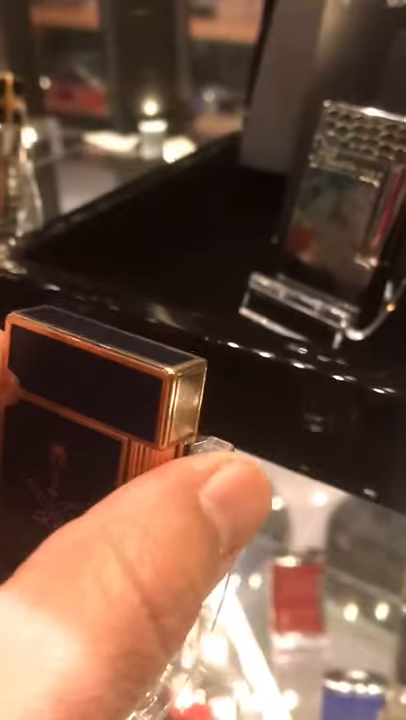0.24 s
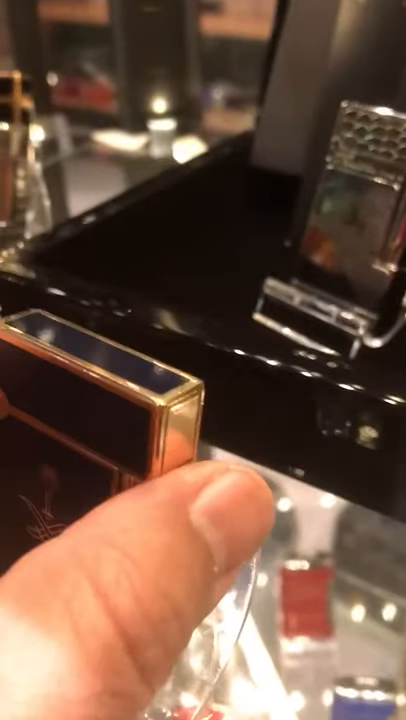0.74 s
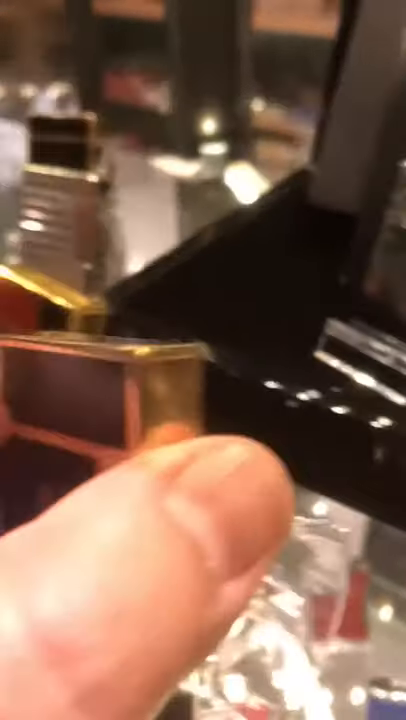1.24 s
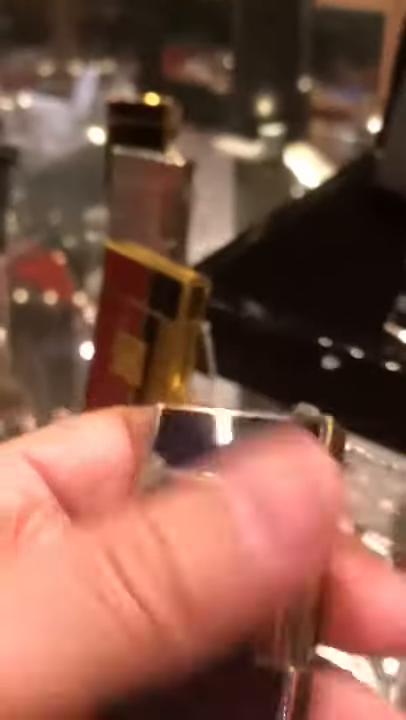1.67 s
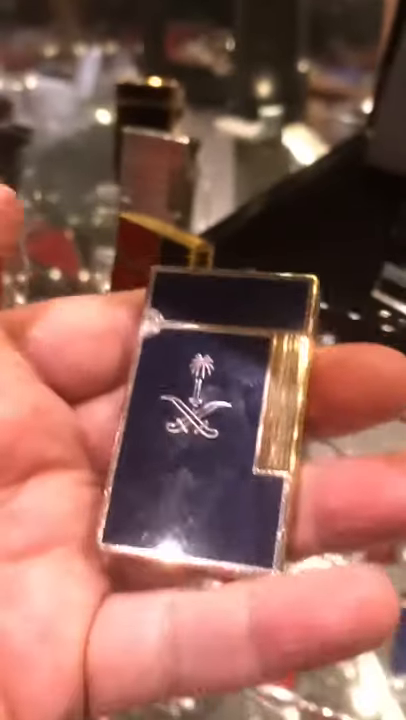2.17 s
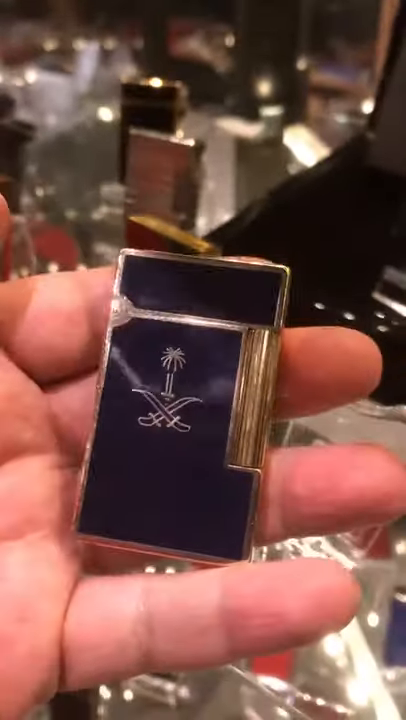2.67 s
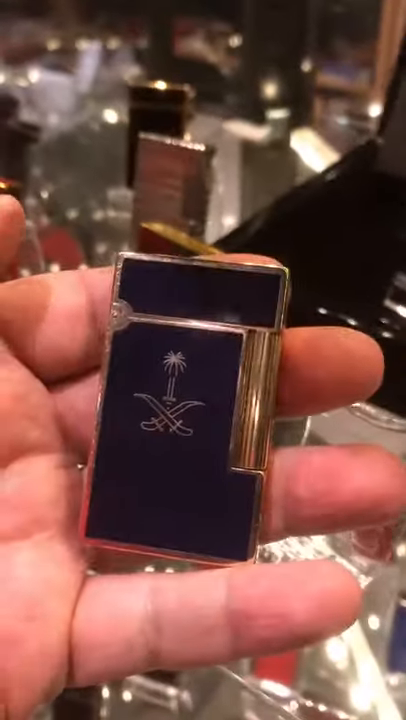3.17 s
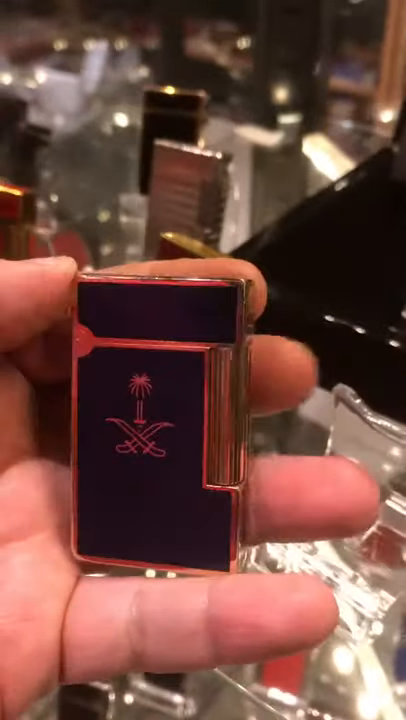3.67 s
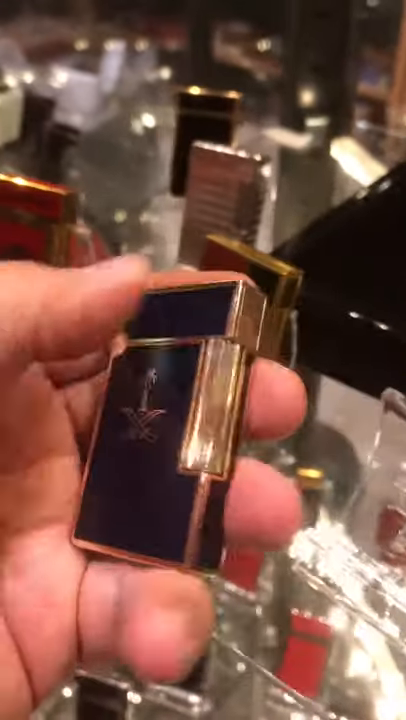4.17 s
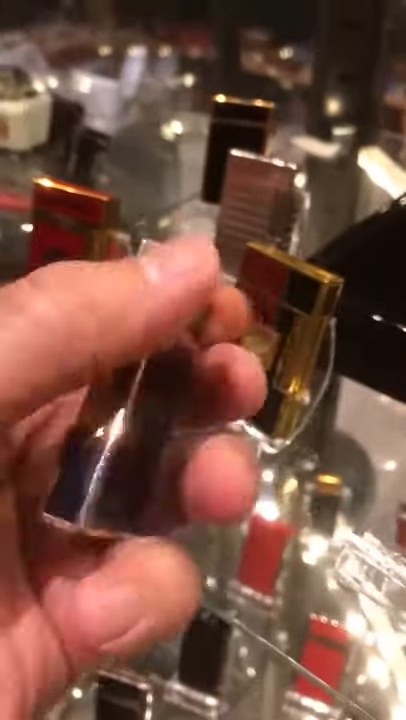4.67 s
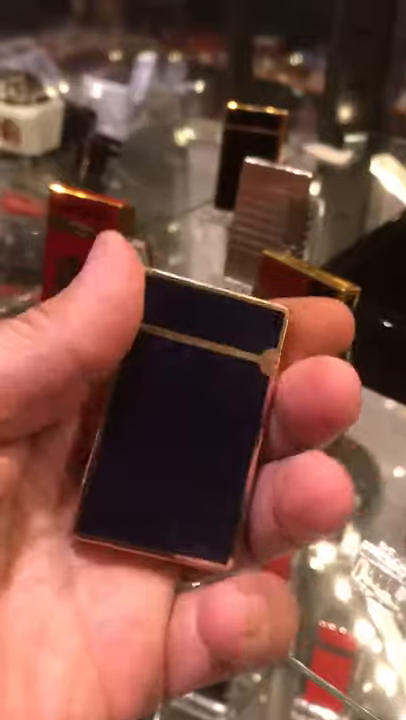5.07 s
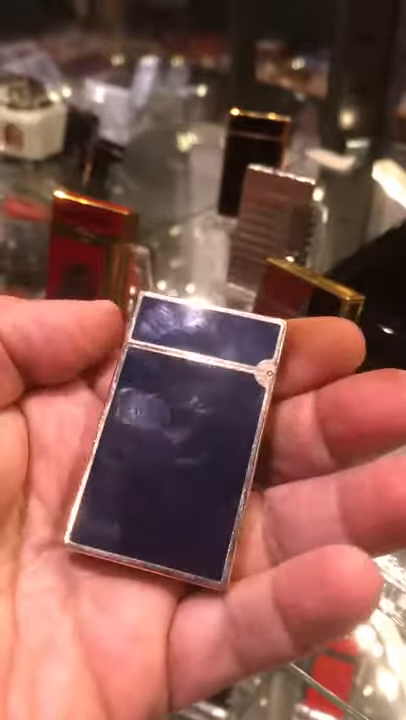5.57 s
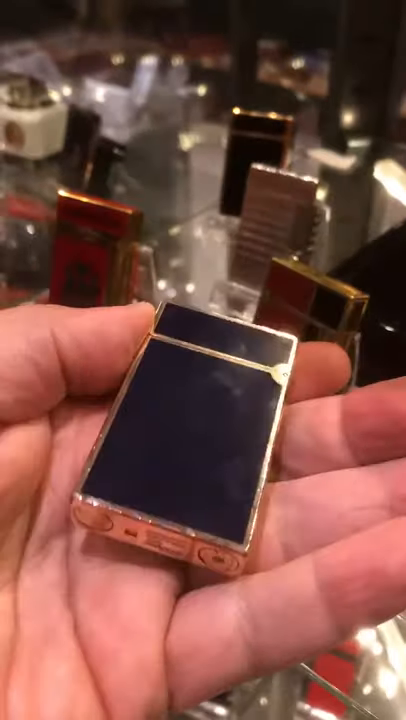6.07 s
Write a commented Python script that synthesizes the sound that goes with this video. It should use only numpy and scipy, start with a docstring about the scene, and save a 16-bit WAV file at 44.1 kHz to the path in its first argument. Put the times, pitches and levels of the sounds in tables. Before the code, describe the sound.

A shop interior hums throughout: deep ventilation rumble, a low mains hum near 100 Hz and weak, slightly wavering fan tones, with little hiss on top. Very faint finger rubbing lies at the start, and two tiny touches come at about 0.3 and 0.6 s. At 0.63 s a small metal lighter lid, very close to the microphone, knocks, rebounds and snaps onto its rim by 0.66 s. It is heard as one loud, hard, bright click with a short, dense metallic ring, then a much weaker chatter from 0.70 to 0.75 s. The ring dies within a couple of tenths of a second; nearby showcases return a quick echo and the large room a faint tail of about a second. From roughly 2 s to the end at about 6.5 s the even hum remains, with barely audible skin rubs around 1.4, 1.65, 4.8 and 5.3 s.

```python
"""Flip-top lighter over a shop counter

A metal lighter is handled close to the microphone, over a glass counter in a shop.
After two faint touches the lid knocks, rebounds and snaps onto the rim within 35 ms: one sharp ringing
click, with a little chatter after it. Noise bursts make the knocks, decaying resonators the metal ring.
Nearby showcases and the large room answer as decaying noise echoes; swells of hiss are fingers on the case.
Ventilation rumbles underneath as filtered noise, and mains hum and fan tones as wavering sines."""
import sys
import numpy as np
from scipy import signal
from scipy.fft import rfft, irfft, next_fast_len
from scipy.io import wavfile
from scipy.ndimage import uniform_filter1d

SR = 44100
rng = np.random.default_rng(int(sys.argv[2]) if len(sys.argv) > 2 else 0)


def wav_record(signal):
    """Record a signal, one row per channel, as 16-bit PCM in the file named by sys.argv[1]."""
    frames = np.transpose(np.atleast_2d(signal))
    bounded = np.clip(frames, -1, 1)
    # unit amplitude maps onto the largest positive 16-bit level
    quanta = np.round(bounded * 32767).astype(np.int16)
    wavfile.write(sys.argv[1], SR, quanta)


N = 278271

# ventilation and hiss: pitch_hz [Hz], level_db [dB per Hz]
AIR_SPECTRUM = [(20, -96), (36, -68), (110, -61), (190, -67), (240, -76), (400, -81.5), (590, -84.5),
                (800, -84.5), (1300, -90.5), (3200, -98), (4900, -108.5), (6500, -108), (7600, -114),
                (9400, -115), (10500, -120.5), (11200, -118), (15500, -118)]
# bands that stand out of the ventilation noise: centre_hz [Hz], width_hz [Hz], level_db [dB rms]
DUCT_BANDS = [(40, 3.1, -45), (49.04, 7, -47), (59.7, 5, -43.5), (66.5, 8.5, -42.5), (82.2, 6, -50.5),
              (120.1, 21, -41), (149.8, 6.2, -52.5), (180.9, 17, -49.5), (289.4, 39.8, -58),
              (12750, 350, -84)]
# mains hum and fan tones: pitch_hz [Hz], level_db [dB rms, before the waver]
HUM_TONES = [(100, -38), (200, -54.5), (500, -66), (619.2, -61.5), (700, -71), (718.8, -68), (821, -70.5),
             (1038, -71.5), (1599, -76)]
# skin sliding on the case: centre_s [s], length_s [s], level_db [dB rms at the peak of the swell],
# singing_share [0-1 of the power that sings in the metal]
FINGER_RUBS = [(0.076, 0.13, -73, .7), (0.222, .07, -66, .9), (1.402, 0.25, -72, 0.1),
               (1.65, 0.14, -71, 0.1), (4.77, .22, -71.5, 0.1), (5.282, .07, -70, .2)]
# colour of the rubbing that sings in the case: pitch_hz [Hz], level_db [relative dB]
CASE_SINGING = [(2000, -18), (6000, -12), (6700, 1), (7400, -10), (11200, -11), (11900, 3), (12700, -9),
                (14000, 1), (16000, -9)]
# lid contacts: start_s [s], knock_db [relative dB], ring_db [relative dB],
# place [0 at the hinge .. 1 on the rim]
LID_CONTACTS = [(0.3175, -42, -54, .75), (0.6065, -38, -44, .6), (0.6295, -1.5, 0, .03),
                (0.6372, -13, -14, .05), (0.6497, -3, -10, .11), (0.6635, -6, 3, .97),
                (0.7028, -22.5, -20.5, .7), (0.7083, -21, -11.5, 1), (0.7328, -19, -23, .75),
                (0.747, -27, -42, .1)]
# the knock with its reflections off the counter, before tilting: pitch_hz [Hz], level_db [relative dB]
KNOCK_SPECTRUM = [(150, -17.5), (250, -18), (360, -32), (520, -13.5), (800, -7.5), (1100, -10.5),
                  (1600, -1), (2300, -9), (3150, 3), (4400, -5.5), (5600, -9.5), (6500, -7.5), (8200, -17),
                  (11000, -17), (12600, -25.5), (14500, -20.5), (16000, -51)]
# modes of lid and case: pitch_hz [Hz], hinge_db [relative dB struck at the hinge],
# rim_db [relative dB struck on the rim], t60_s [s]
LIGHTER_MODES = [(1407, -21.5, -33, 0.17), (1890, -23, -31, .12), (2493, -22.5, -32, 0.16),
                 (2622, -23, -37, 0.17), (2928, -25.5, -34.5, 0.068), (3045, -18.5, -31, .1),
                 (3134, -25.5, -31.5, .11), (3516, -16.5, -32.5, 0.037), (3900, -21, -31, .14),
                 (4153, -19, -35, 0.18), (4200, -23, -26.5, 0.096), (4760, -25, -35, .08),
                 (5160, -26, -19, .06), (5990, -22.5, -21, 0.076), (6060, -28.5, -19, 0.062),
                 (6290, -36.5, -21, .06), (6540, -24, -22, 0.087), (6790, -23.5, -21.5, 0.12),
                 (7735, -21.5, -34, 0.08), (8655, -42, -24, 0.077), (9000, -27.5, -35, 0.12),
                 (10436, -16, -31.5, .06), (10900, -31.5, -30, .05), (11160, -42, -22.5, .045),
                 (11290, -42.5, -22, 0.068), (13474, -42.5, -20, 0.068), (14020, -20, -15, .05),
                 (14400, -42, -27.5, .035)]
# the shop's echo of the knock: pitch_hz [Hz], early_db [dB gain], late_db [dB gain]
SHOP_ECHO = [(200.1, -4.5, -27), (600.2, -2, -26), (1500, -2.5, -27), (3508, -10, -25.5),
             (6527, -17.5, -26), (11000, -25.5, -28), (15000, -31, -31)]

EARLY_T60_S, LATE_T60_S = .23, 1.15
KNOCK_T60_S = .055  # the clatter of every knock dies at the same rate
RIM_DB_PER_OCTAVE = 2  # a knock on the rim is brighter than one at the hinge
SOFT_DB_PER_OCTAVE, SOFT_KNOCK_DB = -2.5, -20  # dulling grows with softness, full at this level and below
SEATED_S = .68  # the lid comes to rest on the rim
CUTOFF_HZ = 15700


def from_db(db):
    """Decibels to gain."""
    return 10 ** (np.asarray(db) / 20)


def rms_one(x):
    """Scale to rms 1."""
    return x / np.sqrt(np.mean(x ** 2) + 1e-20)


def seconds():
    """The time of every sample."""
    return np.arange(N) / SR


def colour(x, points):
    """Causal (minimum-phase) filter through (Hz, dB) points."""
    size = 2 * next_fast_len(N)
    hz, db = np.transpose(points)
    grid = np.maximum(np.arange(size // 2 + 1) * SR / size, 1)
    gain = from_db(np.interp(np.log(grid), np.log(hz), db))
    cepstrum = irfft(np.log(gain))
    # folding the cepstrum onto positive times makes the phase minimal
    cepstrum[1:size // 2] *= 2
    cepstrum[size // 2 + 1:] = 0
    response = np.exp(rfft(cepstrum))
    return irfft(rfft(x, size) * response)[:N]


def dying(start_s, t60_s):
    """An envelope that jumps to 1 and loses 60 dB in t60_s."""
    age = seconds() - start_s
    return (age >= 0) * from_db(-60 * np.clip(age / t60_s, 0, 4))


def ventilation():
    """Broad air noise, with narrow bands where ducts and room resonate."""
    out = colour(rng.standard_normal(N) * np.sqrt(SR / 2), AIR_SPECTRUM)
    for centre_hz, width_hz, level_db in DUCT_BANDS:
        edges_hz = [centre_hz - width_hz / 2, centre_hz + width_hz / 2]
        band = signal.butter(2, edges_hz, "band", fs=SR, output="sos")
        # the first second is dropped so that the resonance is already settled
        resonance = signal.sosfilt(band, rng.standard_normal(N + SR))[SR:]
        out += from_db(level_db) * rms_one(resonance)
    return out


def hum(waver_db):
    """Mains and fan tones of steady pitch whose levels waver slowly and independently."""
    t, out = seconds(), np.zeros(N)
    for pitch_hz, level_db in HUM_TONES:
        knots = rng.standard_normal(size=16)
        waver = np.interp(t, np.linspace(0, t[-1], len(knots)), knots)
        tone = np.sqrt(2) * np.sin(2 * np.pi * (pitch_hz * t + rng.random()))
        out += from_db(level_db + waver_db * waver) * tone
    return out


def fingers(grain_db, low_hz):
    """Skin slides over lacquer in short, grainy swells: a broad hiss, part of which sings in the case."""
    t = seconds()
    roughness = rms_one(uniform_filter1d(rng.standard_normal(N), size=90))  # smoothed over 2 ms
    grains = rng.standard_normal(N) * from_db(grain_db * roughness)
    singing = rms_one(colour(grains, CASE_SINGING))
    highpass = signal.butter(2, low_hz, "high", fs=SR, output="sos")
    broad = rms_one(signal.sosfilt(highpass, rng.standard_normal(N)))
    out = np.zeros(N)
    for centre_s, length_s, level_db, share in FINGER_RUBS:
        swell = from_db(level_db) * np.exp(-2 * ((t - centre_s) / length_s * 1.1) ** 2)
        out += swell * (np.sqrt(share) * singing + np.sqrt(1 - share) * broad)
    return out


def knocks(level_db, crack_db, crack_t60_s):
    """A hard crack, then a dense clatter of short reflections; harder and rim contacts are brighter."""
    out = np.zeros(N)
    hz, db = np.transpose(KNOCK_SPECTRUM)
    octaves = np.log2(hz / 3000)  # the tilt pivots at 3 kHz
    for start_s, knock_db, _, place in LID_CONTACTS:
        clatter = dying(start_s, KNOCK_T60_S)
        crack = from_db(crack_db) * dying(start_s, crack_t60_s)
        burst = rng.choice([-1, 1], N) * (clatter + crack)
        softness = np.clip(knock_db / SOFT_KNOCK_DB, 0, 1)
        tilt_db = (RIM_DB_PER_OCTAVE * place + SOFT_DB_PER_OCTAVE * softness) * octaves
        out += from_db(level_db + knock_db) * colour(burst, np.c_[hz, db + tilt_db])
    return out


def ring(clicks, pitch_hz, t60_s):
    """A unit click sets a tone of height about 1 ringing; a small body radiates no bass."""
    r, w = from_db(-60 / (t60_s * SR)), 2 * np.pi * pitch_hz / SR  # loss and turn per sample
    return signal.lfilter([.5, 0, -.5], [1, -2 * r * np.cos(w), r * r], clicks + 1e-18)


def metal_ring(level_db, scatter_s, after_ring_db, after_t60_s, choke_db):
    """The place of contact decides which modes ring; the seated lid chokes the high ones most."""
    start_s, _, ring_db, place = np.transpose(LID_CONTACTS)
    # at each contact the modes speak at slightly different moments
    lags_s = scatter_s * rng.random((len(start_s), len(LIGHTER_MODES)))
    seated = np.interp(seconds(), [SEATED_S - .006, SEATED_S + .006], [0, 1])
    on_rim = np.interp(seconds(), start_s, place)
    out = np.zeros(N)
    for (pitch_hz, hinge_db, rim_db, t60_s), lag_s in zip(LIGHTER_MODES, lags_s.T):
        mode_db = (1 - place) * hinge_db + place * rim_db
        clicks = np.zeros(N)
        clicks[((start_s + lag_s) * SR).astype(int)] = from_db(level_db + ring_db + mode_db)
        # blows towards the rim leave a faint, longer ping
        after_ring = from_db(after_ring_db) * ring(clicks * on_rim, pitch_hz, after_t60_s)
        choke = from_db(seated * choke_db * (pitch_hz / 10000) ** 2)
        out += (ring(clicks, pitch_hz, t60_s) + after_ring) * choke
    return out


def shop(knock, metal, metal_early_db, metal_late_db, early_delay_s, late_delay_s):
    """Nearby showcases answer quickly; the large room adds a faint, long tail."""
    hz, early_db, late_db = np.transpose(SHOP_ECHO)
    showcases = (early_delay_s, EARLY_T60_S, early_db, metal_early_db)
    room = (late_delay_s, LATE_T60_S, late_db, metal_late_db)
    out = np.zeros(N)
    for delay_s, t60_s, echo_db, metal_db in [showcases, room]:
        tail = rng.standard_normal(N) * dying(delay_s, t60_s)
        response = colour(tail / np.linalg.norm(tail), np.c_[hz, echo_db])
        sent = knock + from_db(metal_db) * metal
        out += signal.fftconvolve(sent, response)[:N]
    return out


def scene():
    """The lighter in the shop, over the ventilation and hum."""
    background = ventilation() + hum(waver_db=1.5)
    rubs = fingers(grain_db=3.0, low_hz=3000)
    knock = knocks(level_db=-1.5, crack_db=1.0, crack_t60_s=.01)
    metal = metal_ring(level_db=0.0, scatter_s=.0012, after_ring_db=-39, after_t60_s=.75, choke_db=-6)
    # the small case rings close to the microphone and sends less into the room than the knock does
    echo = shop(knock, metal, metal_early_db=-5.5, metal_late_db=-13,
                early_delay_s=.0073, late_delay_s=.08)
    return (knock + metal + echo + rubs + background)[None]


def record(dry):
    """The highest peaks are rounded off, the ends are softened and the top is cut."""
    rounded = dry / (1 + dry ** 6) ** (1 / 6)
    faded = rounded * signal.windows.tukey(N, .001)
    lowpass = signal.ellip(10, .2, 80, CUTOFF_HZ, fs=SR, output="sos")
    return signal.sosfilt(lowpass, faded)


dry = scene()
out = record(dry)
wav_record(out)
```